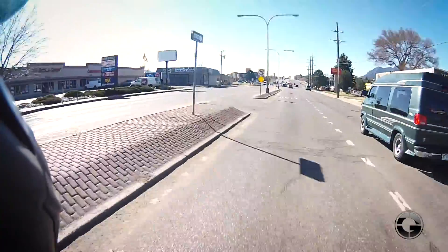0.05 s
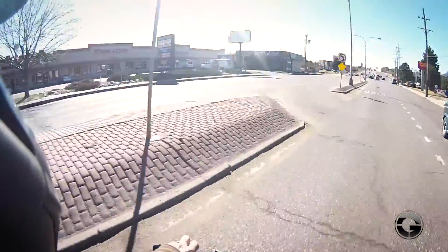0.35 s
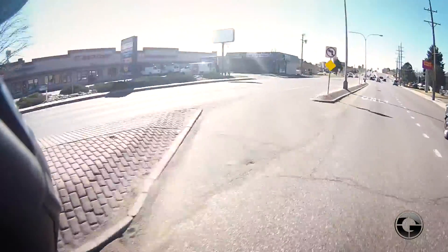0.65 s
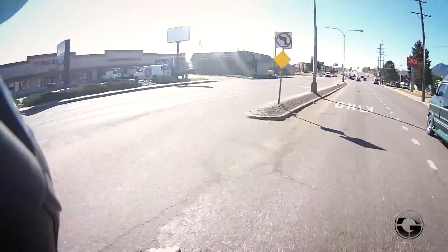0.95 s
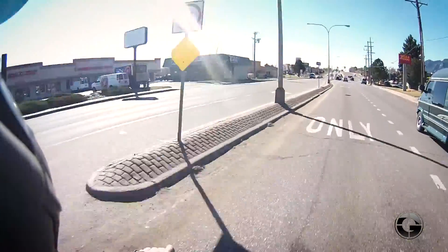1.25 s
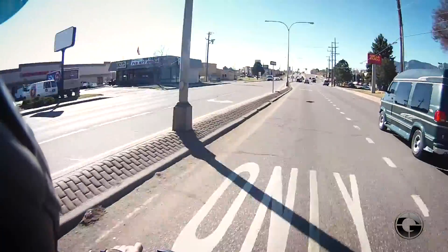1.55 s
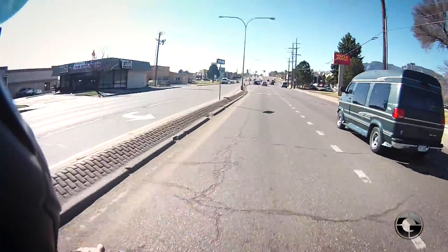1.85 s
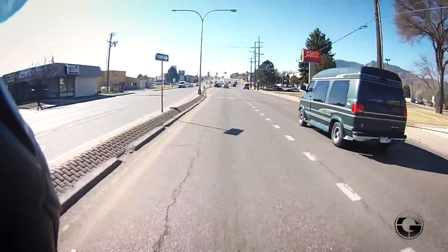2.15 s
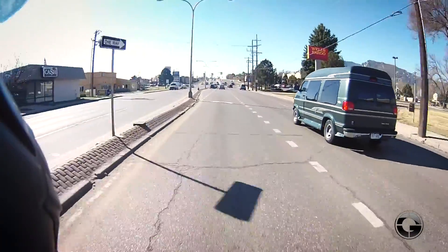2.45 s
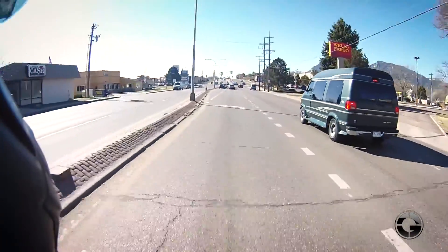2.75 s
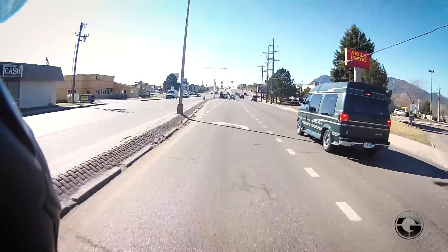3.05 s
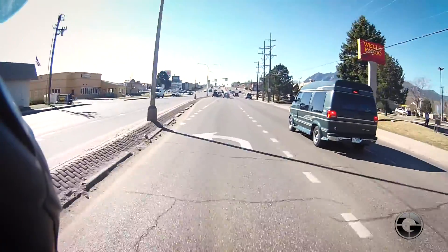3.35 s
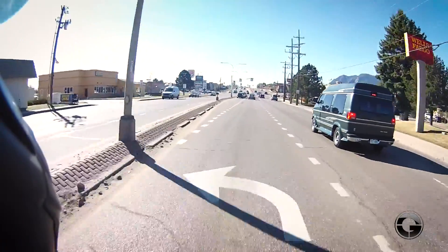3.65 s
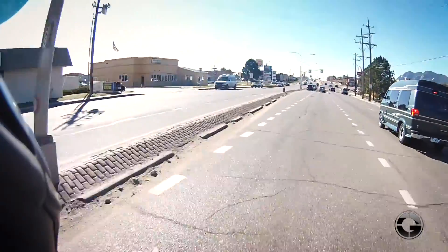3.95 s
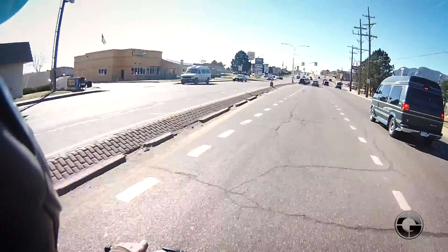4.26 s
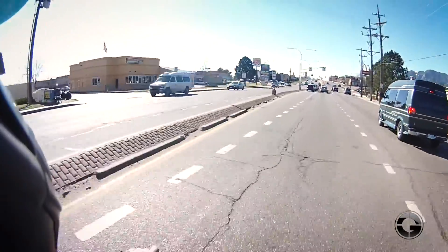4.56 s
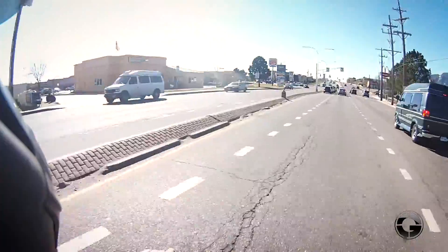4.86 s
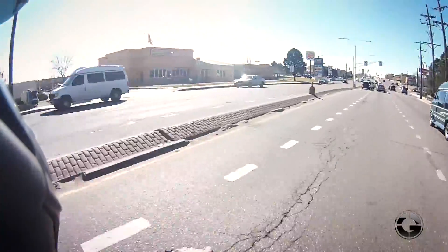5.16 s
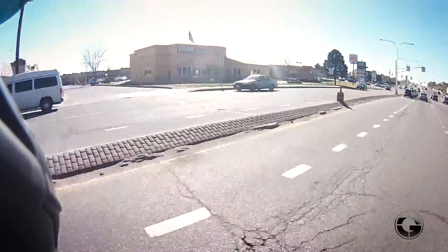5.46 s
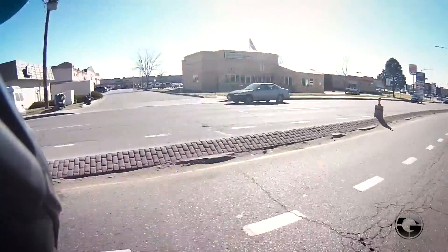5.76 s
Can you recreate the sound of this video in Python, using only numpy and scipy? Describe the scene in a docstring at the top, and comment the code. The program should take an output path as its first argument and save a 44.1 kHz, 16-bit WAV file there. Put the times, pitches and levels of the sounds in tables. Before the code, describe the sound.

A single-cylinder motorcycle with a loud open exhaust is heard close up from the rider's position on a city road. Five quick, barking throttle blips push the revs high, then the engine winds down, with one more blip on the way. It settles into a lumpy, popping idle. Light wind buffeting, tyre roar, engine rattle and a few small ticks lie underneath.

```python
"""A single-cylinder four-stroke motorcycle with an open exhaust, heard from a camera on the rider.
Five throttle blips climb to a high rev, a sixth comes as the revs sink, then it drops to a lumpy,
popping idle. Each firing is a blowdown and a piston push that ring the pipe. Underneath lie engine
rattle, wind, tyre roar, a few ticks, a thin high whistle and a faint electronic whine."""
import sys
import numpy as np
from scipy import signal
from scipy.fft import rfft, irfft
from scipy.io import wavfile
from scipy.ndimage import uniform_filter1d

SR = 44100
rng = np.random.default_rng(int(sys.argv[2]) if len(sys.argv) > 2 else 0)


def int16_out(signal):
    """Quantize to a 16-bit WAV file."""
    q = np.round(np.clip(np.atleast_2d(signal).T, -1, 1) * 32767)
    wavfile.write(sys.argv[1], SR, q.astype(np.int16))


N = 260631
TIME = np.arange(N) / SR
SIZE, LEAD = 4096, 512  # samples in one event, and of pre-roll ahead of a firing
HIGH_REV_HZ, SMOOTH_HZ, LUMPY_HZ, NEAR_IDLE_HZ, IDLE_HZ = 66.06, 46.2, 32.7, 34, 24.3  # firing rates

# engine speed, stepping up with each blip (time [s], firing rate [Hz])
ENGINE_SPEED = [(0.0, 37.49), (0.33, 40.25), (0.44, 43.75), (0.525, 46.64), (0.635, 49.75), (0.795, 49.87),
                (0.895, 52.94), (1.06, 52.46), (1.192, 57.18), (1.33, 56.2), (1.45, 61.17), (1.84, 51.53),
                (2.15, 44.06), (2.63, 36.68), (2.757, 44.44), (3.08, 38.92), (3.6, 30.96), (4.07, 24.46),
                (4.24, 22.65), (4.89, 13.99), (4.99, 18.21), (5.2, 17.57), (5.35, 23.13), (5.72, 21.1),
                (5.91, 24.61)]
# throttle blips (start [s], end [s])
THROTTLE_BLIPS = [(.333, .44), (.525, .635), (.795, .895), (1.06, 1.192), (1.33, 1.437), (2.63, 2.757)]


def exhaust(full_force_db=-9):
    """Each firing thumps the pipe, with gas rasp, a hard edge and ringing metal layered on top."""
    out, age = np.zeros(N + LEAD), (np.arange(SIZE) - LEAD) / SR
    burst_gain = np.sqrt(.01 * SR / SIZE)  # rms 1 over an event becomes the energy of 10 ms at rms 1
    for t, hz, db, throttle, heat in zip(*firings()):
        force = min(undb(db - full_force_db), 1)
        pulse = valve_flow(age, hz, 1 - force, throttle)
        thump = ring(pulse, pipe_response(heat, force, throttle))
        thump = unit(upsweep(thump, age, hz, 1 - force))
        rasp = gas_rasp(age, hz, force, throttle)
        edge = wave_front(t, hz, force)
        idle = hz < IDLE_HZ
        firing = thump + rasp + edge + tip_zing(throttle, heat, idle) + idle * idle_pop(force)
        add(out, t, burst_gain * undb(db) * firing)
    return out[LEAD:]


def firings(high_rev_db=-7, db_per_octave=8.5, open_db=-10, shut_db=-4.5, stumble_db=-4, sag_db=-2,
            pull_db=2, lope_db=-3, scatter_db=2.5, jitter=.0015, lumpy_jitter=.012, advance_s=.0014):
    """Time, rate, level, throttle and gas heat of each firing: even at high revs, loping at low."""
    # misfires (time [s], level change [dB])
    misfires = [(.08, -0.5), (1.613, -3.5), (1.738, -4), (1.932, -1.5), (2.53, -2.5), (3.29, -1.5),
                (3.37, -2.5), (3.49, -3.5), (3.97, -5), (4.8, -10), (5.05, -3)]
    # pops of unburnt fuel at low revs (time [s], level [dB], rasp [0-1])
    pops = [(3.313, -16.5, 0.15), (3.345, -17.5, 0.1), (3.4, -17, 0.3), (3.72, -17, 0), (3.86, -21.5, 0),
            (4.02, -21.5, 0), (4.13, -21, .05), (4.27, -21.5, 0), (4.46, -24, 0.1), (4.87, -25, 0.17),
            (4.93, -22, 0.06), (4.99, -17.5, 0.41), (5.11, -22, 0), (5.27, -14.5, 0.08), (5.31, -13.5, 0.2),
            (5.49, -22, 0), (5.58, -21, 0), (5.68, -21.5, 0), (5.77, -14, 0), (5.81, -13.5, 0),
            (5.86, -19, 0)]
    turned = cycles()
    number = np.arange(int(turned[-1]) + 1)
    t = np.interp(number, turned, TIME)
    hz = curve(ENGINE_SPEED, t)
    throttle, heat = blipping(t)
    level_chance, time_chance = rng.standard_normal((len(t), 2)).T
    db = np.minimum(high_rev_db + db_per_octave * np.log2(hz / HIGH_REV_HZ), high_rev_db)
    # low revs sag, pull harder while gathering speed, and weaken every second firing
    lumpy = np.clip((SMOOTH_HZ - hz) / (SMOOTH_HZ - LUMPY_HZ), 0, 1)
    octaves_per_s = np.gradient(np.log2(hz), t)
    db += lumpy * (sag_db + pull_db * octaves_per_s + lope_db * (number % 2) + scatter_db * level_chance)
    # an open throttle has one level at any speed, fading as it shuts
    db += throttle * (open_db - db) + shut_db * heat ** 5
    for start, _ in THROTTLE_BLIPS:
        db[np.searchsorted(t, start) - 1] += stumble_db
    for when, drop_db in misfires:
        db[np.argmin(abs(t - when))] += drop_db
    for when, pop_db, rasp in pops:
        nearest = np.argmin(abs(t - when))
        db[nearest], throttle[nearest] = pop_db, rasp
    wobble_s = (jitter + lumpy_jitter * lumpy ** 2) * time_chance / hz
    onset = t + wobble_s - advance_s * (heat > 0)  # pulses come early within a blip
    idling = np.clip((NEAR_IDLE_HZ - hz) / (NEAR_IDLE_HZ - IDLE_HZ), 0, 1)
    return onset, hz, db, throttle, heat + .64 * idling  # the pipe also rings higher towards idle


def cycles():
    """Engine cycles turned so far; the exhaust valve opens at each whole number."""
    return np.cumsum(curve(ENGINE_SPEED, TIME)) / SR - .07


def blipping(t, snap=.81, skew=.9):
    """Throttle and gas heat, 0-1: the throttle snaps open and shut, the heat builds until it shuts."""
    progress = sum((t - start) / (end - start) * ((t > start) & (t < end))
                   for start, end in THROTTLE_BLIPS)
    return abs(np.sin(np.pi * progress ** skew)) ** snap, progress


def valve_flow(age, hz, weakness, throttle, suck_s=.0012, suck_lead_s=.0013, blow_s=.00037,
               push_s=.00022, push_lag_s=.004875):
    """Gas through the exhaust valve in one cycle: suck-back, blowdown, then the piston's push."""
    slow, starved = 40 / hz, weakness ** 3
    # after a weak charge the cylinder sucks more back and empties more slowly
    suck_gain = 2 + 13 * weakness - 1.9 * starved + .11 * throttle
    suck = suck_gain * puff(age + suck_lead_s * slow ** .54, suck_s)
    blowdown = (1 - .39 * starved) * puff(age, blow_s * (1 + 2.2 * starved) / (1 + .023 * throttle))
    # the push comes sooner at high revs, gently at idle, strong and uneven in a starved cycle
    lag_stretch = 1 + .067 * throttle / slow ** 2 + .2 * starved * rng.standard_normal()
    lag_s = push_lag_s * slow ** .63 * lag_stretch
    gentle = max(slow - 1, 0) * (1 - starved)
    push = puff(age - lag_s, push_s * (1 + 2 * starved + .63 * gentle)) / (1 + .72 * gentle)
    push_gain = .15 + 1.2 * weakness + 2.1 * starved + .086 * throttle * slow ** 3
    return blowdown - suck + push_gain * push


def pipe_response(heat, force, throttle, main_hz=229, main_s=.012):
    """Hot gas raises the pipe's pitch; strong waves die sooner, weak ones ring hollow, blips bark."""
    # body of the exhaust pipe (frequency [Hz], gain [dB])
    pipe_spectrum = [(30, -36.5), (66, -32), (110, -14), (178, -2.27), (228, 1), (272, 1), (322, 1),
                     (390, 2.5), (470, -3), (600, -5.5), (760, -23.5), (1200, -20.5)]
    rise = 1 + .29 * heat
    body = response(np.array(pipe_spectrum) * [rise, 1])
    main = undb(2.63 + 6.5 * heat) * resonance(main_hz * rise, main_s * np.exp(-force))
    hollow = (1 - force) ** 2 * undb(2 + 8 * heat) * resonance(hz=335, decay_s=.0049)
    bark = throttle * undb(2) * resonance(hz=570, decay_s=.0091)
    return body + ring(body, main + hollow + bark)


def upsweep(thump, age, hz, weakness, depth=.38, open_s=.0056, early_s=.0036):
    """The open cylinder lowers the pitch until the piston rises: weak putts start early and sweep up."""
    span_s = open_s * IDLE_HZ / hz
    warp_s = weakness ** 2 * (early_s - depth * span_s * np.tanh(age / span_s))
    return np.interp(age + warp_s, age, thump)


def gas_rasp(age, hz, force, throttle, shut_db=-35, open_boost_db=11.5, db_per_octave=5, width_s=.003):
    """Gas tears out of the outlet in a puff of noise, louder on an open throttle."""
    # colour of the rasp (frequency [Hz], gain [dB])
    gas_spectrum = [(60, -23.5), (300, 9), (600, -0.5), (1000, -1), (1300, -1.5), (1540, 5.5), (1850, -8.5),
                    (2300, -8), (2900, -17), (4500, -23), (8000, -35), (11000, -39.5), (14000, -58.5)]
    turbulence = rng.standard_normal(SIZE) * puff(age - .0011, width_s)
    db = shut_db + throttle * (open_boost_db + db_per_octave * np.log2(hz / SMOOTH_HZ) * force)
    return undb(db) * unit(ring(turbulence, response(gas_spectrum)))


def wave_front(t, hz, force, front_db=-18, crack_db=-39, scatter_db=5):
    """Strong waves steepen down the pipe, most at high revs: upper modes ring and the hardest crack."""
    # upper pipe resonances (frequency [Hz], gain [dB])
    front_spectrum = [(400, -4.5), (600, 9.5), (770, -9), (900, 9), (1080, -0.5), (1280, -1.5),
                      (1530, -0.5), (1900, -28), (4000, -39), (12000, -71)]
    # colour of the crack (frequency [Hz], gain [dB])
    crack_spectrum = [(800, -6.5), (1800, 5), (3000, 4), (5000, -7.5), (9000, -18.5), (11300, -15.5),
                      (12500, -36), (15000, -42)]
    # firings that snap hardest (time [s], extra crack [dB])
    snaps = [(.845, 10.5), (.94, 8), (1.271, 7.5), (1.46, 4), (1.477, 4.5), (1.51, 5.5), (1.544, 7),
             (1.595, 7), (1.63, 9), (1.683, 4.5), (2.69, 17), (2.714, 11)]
    front = unit(np.roll(response(front_spectrum), LEAD))
    crack = unit(np.roll(response(crack_spectrum), LEAD))
    steepness = force * hz / HIGH_REV_HZ
    snap_db = sum(extra_db for when, extra_db in snaps if abs(t - when) * hz < .5)
    crack_gain = undb(crack_db + snap_db + scatter_db * rng.uniform(-.92, 1))
    return front * steepness ** 2 * undb(front_db) + crack * steepness ** 4.3 * crack_gain


def tip_zing(throttle, heat, idle, zing_db=-19):
    """The pipe's end zings on an open throttle and on raspy pops."""
    # modes of the pipe's end (frequency [Hz], decay [s], level [dB])
    tip_modes = [(1080, 0.0041, -2.5), (1535, 0.0062, 5), (1630, 0.0016, -8.5), (2240, 0.0017, -12),
                 (2930, 0.003, -15)]
    return struck(tip_modes) * throttle * heat * (1 + .72 * idle) * undb(zing_db)


def idle_pop(force, cough_db=-7, shield_db=-34):
    """At idle the pipe coughs, and hard pops jar a thin metallic ring out of the bike."""
    # hollow cough of the pipe (frequency [Hz], decay [s], level [dB])
    cough_modes = [(365, 0.01, 3.5), (415, 0.0086, -2)]
    # thin metal, likely a heat shield (frequency [Hz], decay [s], level [dB])
    shield_modes = [(4370, .003, 8), (5100, .0015, 5.5), (5700, .001, -4)]
    cough = struck(cough_modes) * force * undb(cough_db)
    return cough + struck(shield_modes) * force ** 3 * undb(shield_db)


def wind(gust_db=2.5):
    """Wind buffets the microphone in low gusts."""
    # colour of the buffeting (frequency [Hz], gain [dB])
    wind_spectrum = [(20, -12.5), (60, -2), (120, 2.5), (250, -1.5), (450, -11), (1000, -40.5), (4000, -94)]
    # swell of the wind (time [s], level [dB])
    wind_level = [(0, -39), (1.3, -33), (1.8, -42), (3.2, -36.5), (4.3, -43), (4.85, -50.5), (5.3, -44),
                  (5.91, -49)]
    return noise(wind_spectrum) * undb(curve(wind_level, TIME) + gust_db * walk(7.7))


def roar(high_rev_db=-40.5, db_per_octave=3):
    """Engine and tyres roar, following the revs."""
    # colour of the roar (frequency [Hz], gain [dB])
    roar_spectrum = [(200, -8.5), (450, 4), (700, -3), (1000, -2.5), (1400, -10), (2000, -22), (4000, -35),
                     (9000, -45.5), (14000, -75.5)]
    octaves = np.log2(curve(ENGINE_SPEED, TIME) / HIGH_REV_HZ)
    return noise(roar_spectrum) * undb(high_rev_db + db_per_octave * octaves + walk(17))


def valve_rattle(beat_depth=.084, flicker_db=1.5):
    """The valve gear rattles: bright noise that pulses twice a cycle."""
    # colour of the rattle (frequency [Hz], gain [dB])
    rattle_spectrum = [(700, -12), (1500, -0.5), (2500, -5.5), (3400, -8.5), (4400, -16.5), (5500, -20),
                       (7500, -29), (10800, -28), (12200, -40.5), (16000, -60.5)]
    # rattle fading towards idle (time [s], level [dB])
    rattle_level = [(0.0, -48.5), (0.36, -52), (0.57, -48.5), (1.13, -51), (1.3, -50), (3.05, -55.5),
                    (3.15, -53), (3.42, -56), (3.52, -59), (3.95, -61), (5.91, -71.5)]
    beat = 1 + beat_depth * np.cos(2 * np.pi * 2 * cycles())
    return noise(rattle_spectrum) * beat * undb(curve(rattle_level, TIME) + flicker_db * walk(40))


def ticks(decay_s=.00074, trim_db=-1):
    """Loose hard parts on the bike tap each other."""
    # sharp taps (time [s], level [dB])
    taps = [(2.284, -36.5), (2.315, -41.5), (2.605, -46), (2.885, -37.5), (4.566, -37.5), (4.588, -32.5)]
    # colour of a tap (frequency [Hz], gain [dB])
    tap_spectrum = [(1500, 2), (4000, 1), (6000, -0.5), (9000, -10), (11000, -17.5), (15000, -36)]
    out, age, body = np.zeros(N), np.arange(SIZE) / SR, response(tap_spectrum)
    for t, db in taps:
        tap = ring(rng.standard_normal(SIZE) * np.exp(-age / decay_s), body)
        add(out, t, undb(db + trim_db) * tap / abs(tap).max())
    return out


def whistle(top_hz=12500, fade_s=.012, hiss_db=-72, hiss_at_s=2.12, hiss_width_s=.091):
    """A thin, high whistle of evenly spaced overtones comes and goes over a swell of narrow hiss."""
    # overtones of the whistle (frequency [Hz], level [dB])
    overtones = [(6000, -83), (7200, -78), (8400, -80), (9600, -86), (12000, -92), (13200, -87),
                 (14400, -89)]
    # whistle bursts (start [s], end [s], gain [dB], extra gain above top_hz [dB])
    bursts = [(1.9, 2.028, -2, -16), (2.105, 2.165, -1, 1), (2.245, 2.315, -3, 1), (2.33, 2.385, -3, 2),
              (2.43, 2.5, -2, 1)]
    # band of the hiss (frequency [Hz], gain [dB])
    hiss_spectrum = [(7000, -30), (8400, 0.5), (8900, 0), (10000, -31)]
    swell = np.exp(-.5 * ((TIME - hiss_at_s) / hiss_width_s) ** 2)
    out = noise(hiss_spectrum) * undb(hiss_db) * swell
    flutter = undb(2 * walk(45))
    for start, end, burst_db, top_db in bursts:
        gate = uniform_filter1d(1. * ((TIME > start) & (TIME < end)), int(fade_s * SR))
        tones = sum(tone(hz, db + top_db * (hz > top_hz)) for hz, db in overtones)
        out += undb(burst_db) * gate * flutter * tones
    return out


def whine():
    """The camera's electronics give off a faint, steady whine."""
    # tones of the whine (frequency [Hz], rms level [dB])
    whine_tones = [(10341, -93.5), (10401, -92), (10519, -74.5), (10578, -93.5)]
    return sum(tone(hz, db) for hz, db in whine_tones)


def undb(db):
    """Decibels to gain."""
    return 10 ** (np.asarray(db) / 20)


def unit(x):
    """Scale to rms 1."""
    return x / np.sqrt(np.mean(x ** 2) + 1e-18)


def curve(rows, t):
    """Straight lines through (time, value) points."""
    return np.interp(t, *np.transpose(rows))


def response(points):
    """Minimum-phase impulse response of a (frequency [Hz], gain [dB]) spectrum."""
    hz, db = np.transpose(points)
    bins = np.maximum(np.arange(SIZE // 2 + 1) * SR / SIZE, 1)
    cepstrum = irfft(np.log(undb(np.interp(np.log(bins), np.log(hz), db))))
    fold = np.r_[1, np.full(SIZE // 2 - 1, 2), 1, np.zeros(SIZE // 2 - 1)]
    return irfft(np.exp(rfft(cepstrum * fold)))


def resonance(hz, decay_s):
    """Impulse response of one mode, with a gain near 1 at its pitch."""
    age = np.arange(SIZE) / SR
    return np.exp(-age / decay_s) * np.cos(2 * np.pi * hz * age) * 2 / (decay_s * SR)


def struck(modes):
    """Ring of a table of modes, starting LEAD samples in, rms 1."""
    age = np.maximum(np.arange(SIZE) - LEAD, 0) / SR
    return unit(sum(undb(db) * np.exp(-age / decay_s) * np.sin(2 * np.pi * hz * age)
                    for hz, decay_s, db in modes))


def ring(x, impulse):
    """Pass x through an impulse response."""
    return signal.fftconvolve(x, impulse)[:len(x)]


def tone(hz, db):
    """A steady sine at an rms level."""
    return undb(db) * np.sqrt(2) * np.sin(2 * np.pi * hz * TIME)


def noise(points):
    """Noise of a given spectrum, rms 1."""
    return unit(ring(rng.standard_normal(N), response(points)))


def walk(rate_hz):
    """Slow random drift, rms 1."""
    hold = int(SR / rate_hz)
    steps = np.repeat(rng.standard_normal(N // hold + 1), hold)
    return unit(uniform_filter1d(steps, hold)[:N])


def puff(age, width):
    """A rounded pressure pulse whose area is the same at any width."""
    return np.exp(-.5 * (age / width) ** 2) / width


def add(out, t, x):
    """Mix x into out from time t on."""
    part = out[int(t * SR):][:len(x)]
    part += x[:len(part)]


def scene():
    """Everything rides along with the microphone, in open air, in mono."""
    background = wind() + roar() + valve_rattle() + ticks() + whistle() + whine()
    return (background - exhaust())[None]


def record(dry, ceiling=.95, top_hz=15800):
    """The camera rounds the very highest peaks and cuts the top."""
    rounded = dry / (1 + (dry / ceiling) ** 8) ** (1 / 8)
    return signal.sosfilt(signal.ellip(8, .2, 80, top_hz, fs=SR, output="sos"), rounded)


dry = scene()
out = record(dry)
int16_out(out)
```